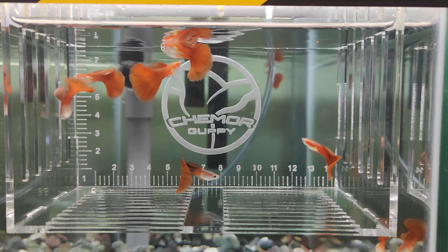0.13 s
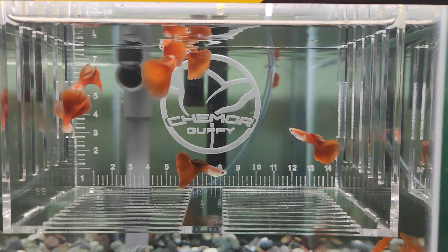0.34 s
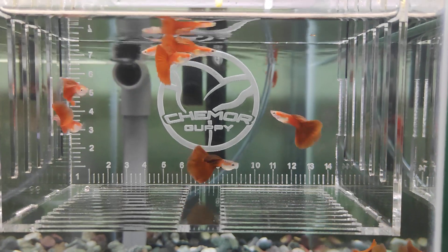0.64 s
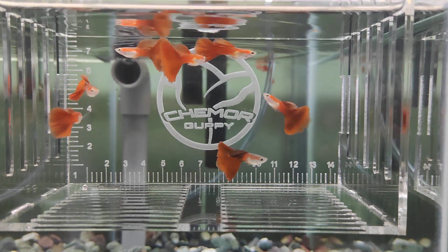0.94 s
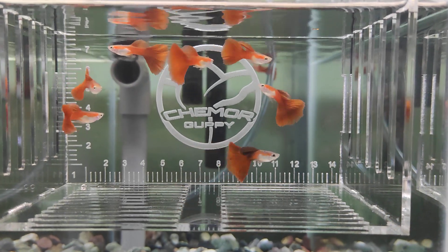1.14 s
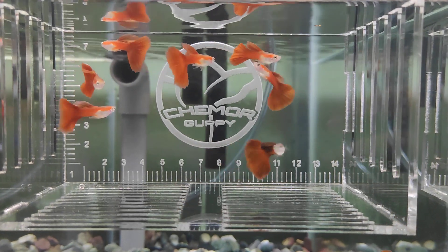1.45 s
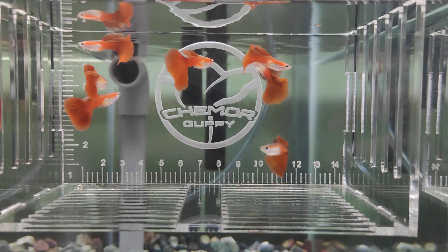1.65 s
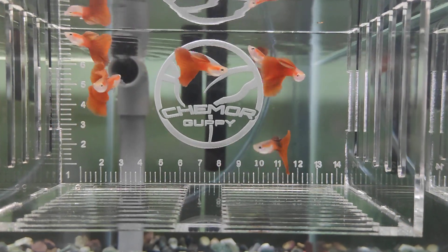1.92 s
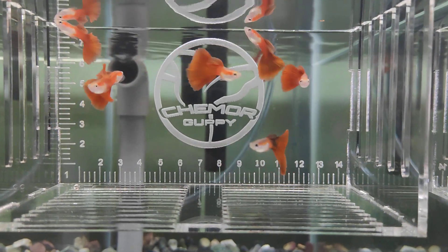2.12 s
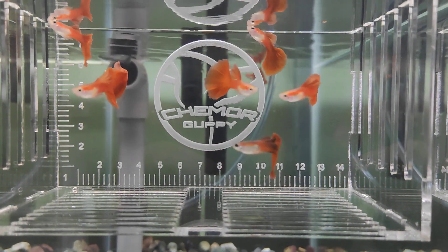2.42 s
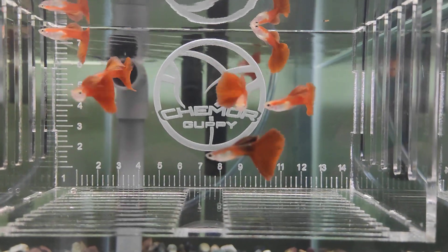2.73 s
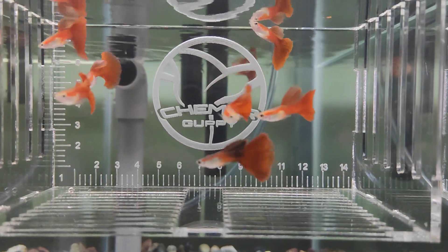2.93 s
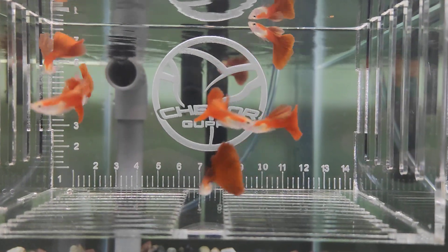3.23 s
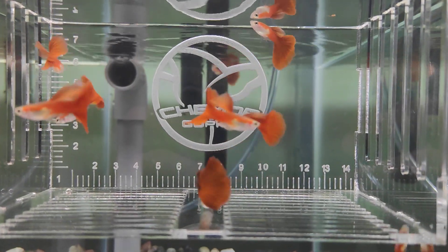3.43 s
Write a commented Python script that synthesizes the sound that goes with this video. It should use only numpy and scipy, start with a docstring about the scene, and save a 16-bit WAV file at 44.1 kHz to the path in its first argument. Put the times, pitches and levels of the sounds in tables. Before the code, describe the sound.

Steady fizzing trickle of fish tank filter water, with small bubble pops and faint pump hum.

```python
"""Water from an aquarium filter trickles back into the tank in a small room: a fizz of ringing bubbles
over a smooth noise hiss. Louder bubbles burst and short splashes spray, both as narrow noise.
A pump drones below as coloured noise and gurgling, with faint mains sines and a deep noise rumble.
A hand-held two-microphone recorder fades in; its right port faces the water and rings near 5.5 kHz,
its left port is duller."""
import sys
import numpy as np
from scipy import signal
from scipy.fft import rfft, irfft
from scipy.io import wavfile

SR = 44100
rng = np.random.default_rng(int(sys.argv[2]) if len(sys.argv) > 2 else 0)


def digitize_waveform(pressure):
    """Quantize a signal to 16-bit integers and store it at the path in sys.argv[1].

    Rows of a 2-D input are taken as channels; values are limited to [-1, 1].
    """
    field = np.atleast_2d(pressure).T
    bounded = np.clip(field, -1, 1)
    quanta = np.round(bounded * 32767).astype(np.int16)
    wavfile.write(sys.argv[1], SR, quanta)


N = 157437
TIME_S = np.arange(N) / SR
BIN_HZ = np.fft.rfftfreq(N, 1 / SR)


def amp(db):
    """Amplitude ratio of a level in dB."""
    return 10 ** (np.asarray(db) / 20)


def rms_one(x):
    """Scale to an RMS of 1 over all channels."""
    return x / np.sqrt(np.mean(x ** 2) + 1e-20)


def at_time(points):
    """Join (s, value) points by straight lines over the scene."""
    return np.interp(TIME_S, *np.transpose(points))


def at_hz(points, hz):
    """Join (Hz, value) points by straight lines over log frequency."""
    p = np.array(points)
    return np.interp(np.log(hz + 1e-9), np.log(p[:, 0]), p[:, 1])


def drift(rate_hz):
    """Random wander: normal values, two per cycle of rate_hz, joined by straight lines."""
    knots = rng.standard_normal(200)
    return np.interp(TIME_S * rate_hz * 2, np.arange(len(knots)), knots)


def colour(x, points):
    """Filter by a (Hz, dB) spectrum, falling steeply below its first point."""
    low_hz = points[0][0]
    low_end = (BIN_HZ > low_hz / 2) * np.minimum(1, BIN_HZ / low_hz) ** 4
    return irfft(rfft(x) * amp(at_hz(points, BIN_HZ)) * low_end, N)


def patchy(low_hz, high_hz, count, patchy_db):
    """Two white noises whose overlapping bands flicker in level, partly together."""
    white = rfft(rng.standard_normal((2, N)))
    log_place = np.log((BIN_HZ + 1) / low_hz) / np.log(high_hz / low_hz)
    place = np.clip(log_place, 0, 1) * (count - 1)
    together = drift(3.97)
    out = 0
    for k in range(count):
        one_band = irfft(white * np.clip(1 - abs(place - k), 0, 1), N)
        out = out + amp(patchy_db * (together / 2 + drift(14.0))) * one_band
    return out


def band(x, hz, width, order=2):
    """Band-pass from hz / (1 + width) to hz * (1 + width), applied twice."""
    edges_hz = [hz / (1 + width), min(hz * (1 + width), .45 * SR)]
    sos = signal.butter(order, edges_hz, "band", fs=SR, output="sos")
    return signal.sosfilt(np.vstack([sos, sos]), x)


ROOM_T60_S, ROOM_DB = .12, 5   # ROOM_DB: reflections re direct sound


def room(x, db=ROOM_DB):
    """Direct sound plus a dying scatter of reflections, different for each port."""
    t = np.arange(SR // 4) / SR
    tail = rng.standard_normal((2, len(t))) * amp(-60 * t / ROOM_T60_S) * (t > .002)
    tail *= amp(db) / np.sqrt(np.sum(tail ** 2, axis=1, keepdims=True))
    tail[0, 11] = tail[1, 0] = 1   # direct sound, 11 samples later on the left
    return signal.fftconvolve(x * np.ones((2, 1)), tail, axes=1)[:, :N]


def bubbles(low_hz, high_hz, per_s, cycles, spread_db):
    """Bubbles born at random, each swelling quickly and ringing some cycles at one of 30 pitches."""
    sizes = amp(spread_db * np.minimum(rng.exponential(1, N), 4)) * rng.choice([-1, 1], N)
    born = rng.random(N) < per_s * amp(1.5 * drift(6.0)) / SR
    pitch_index = rng.integers(0, 30, N)
    out = 0
    for k, hz in enumerate(np.geomspace(low_hz, high_hz, 30)):
        r = amp(-120 * hz / (cycles * SR))
        w = 2 * np.pi * hz / SR
        sos = [[np.sin(w), 0, 0, 1, -2 * r * np.cos(w), r * r]] * 2   # twice: swells, then dies
        impulses = sizes * born * (pitch_index == k)
        out = out + signal.sosfilt(sos, impulses + 1e-18) * (hz / SR) ** 2
    return out


# Deepest rumble: start_s, level_db
RUMBLE_LEVEL = [(0.3, -56.5), (1.11, -57), (1.36, -59), (1.67, -51.5), (1.76, -59), (1.92, -49),
                (2.24, -58), (2.38, -47.5), (2.7, -55), (3.57, -53.5)]
RUMBLE_HZ, RUMBLE_WIDTH, RUMBLE_ALIKE = 38.4, 2.47, 0.32


def rumble():
    """Wide low band of noise, partly shared by both sides, its level following the table."""
    deep = rng.standard_normal((3, N))
    sides = deep[:2] + RUMBLE_ALIKE * 2 * deep[2]
    return rms_one(band(sides, RUMBLE_HZ, RUMBLE_WIDTH, order=1)) * amp(at_time(RUMBLE_LEVEL))


# Mains tones: multiple, mean_level_db (RMS), left_minus_right_db
MAINS_TONES = [(1, -62, -7), (10, -66.5, -3), (11, -72, 5), (12, -68.5, 5), (14, -79, -12), (15, -80.5, -3),
               (18, -70, 7)]
MAINS_HZ = 49.97


def mains():
    """Sines at multiples of the mains frequency, each wandering in level."""
    out = 0
    for multiple, db, pan_db in MAINS_TONES:
        side_db = np.array([[pan_db], [-pan_db]]) / 2
        level = amp(db + side_db + 2.0 * drift(1.95)) * np.sqrt(2)
        out = out + level * np.sin(2 * np.pi * (multiple * MAINS_HZ * TIME_S + rng.random()))
    return out


# Pump and room drone spectrum: freq_hz, relative_density_db
DRONE_SPECTRUM = [(53, -21), (90, -2), (104, -4), (125, -10.5), (160, -2), (183, -5.5), (209, -10),
                  (233, -3), (257, -3.5), (289, 0), (396, -10.5), (468, -10.5), (498, -13.5), (528, -12),
                  (596, -12.5), (656, -19), (887, -10), (965, -13.5), (1160, -7), (1230, -12.5),
                  (1270, -16.5), (1440, -21.5), (1600, -15), (2080, -30), (3520, -120)]
# Stereo likeness: freq_hz, left_right_likeness (0 to 1)
DRONE_LIKENESS = [(25, 0.89), (60, 1), (110, 0.55), (200, 0.76), (370, 0.91), (560, 0.34), (760, .25),
                  (1240, 0.29), (1600, 0.17)]
# Stereo balance: freq_hz, left_minus_right_db
DRONE_PAN = [(25, -8), (120, -.5), (370, 0.5), (760, -5), (1100, 1), (1600, 2)]
# Slow change of drone level: start_s, change_db
DRONE_LEVEL = [(.3, 1.5), (1.2, .5), (2.0, -1), (2.45, .5), (2.9, -1), (3.57, -.5)]
DRONE_DB, DRONE_PATCHY_DB = -48, 1.07
# bigger bubbles in the filter outlet
GURGLE_PER_S, GURGLE_DB, GURGLE_SPREAD_DB, GURGLE_CYCLES = 250, -12, 3.5, 22.3


def drone():
    """Low noise and gurgling in the room's resonances, spread by likeness and balance per frequency."""
    gurgle = rms_one(room(bubbles(199.4, 1596, GURGLE_PER_S, GURGLE_CYCLES, GURGLE_SPREAD_DB)))
    noise = rms_one(patchy(37, 1600, count=10, patchy_db=DRONE_PATCHY_DB))
    mid, side = rfft(noise + amp(GURGLE_DB) * gurgle)
    alike = np.clip(at_hz(DRONE_LIKENESS, BIN_HZ), -1, 1)
    both = np.sqrt(1 + alike) * mid + np.sqrt(1 - alike) * side * [[1], [-1]]
    both = both * amp(at_hz(DRONE_PAN, BIN_HZ) / 2 * [[1], [-1]])
    top_end = np.minimum(1, DRONE_SPECTRUM[-1][0] / (BIN_HZ + 1)) ** 8
    both = irfft(both * top_end, N)
    return amp(DRONE_DB + at_time(DRONE_LEVEL)) * rms_one(colour(both, DRONE_SPECTRUM))


# Short splashes: start_s, length_s, level_db (RMS before envelope and room), centre_hz, left_minus_right_db
SPLASHES = [(1.234, 0.021, -43, 10800, -18), (1.331, 0.0088, -41, 8700, -18), (1.218, .015, -46, 9500, -18),
            (1.41, .036, -39, 8800, -18), (2.02, .01, -47, 10200, -18), (2.333, 0.0059, -38.5, 3000, -0.5),
            (2.342, 0.0067, -38, 2030, -2), (2.711, 0.035, -44, 7700, -18), (2.84, 0.027, -46, 7650, -21),
            (3.183, .015, -53, 11000, -12), (3.27, 0.035, -52, 1670, 0), (3.468, .012, -43, 7800, -20)]


def splashes():
    """Bands of noise, each under half a sine of level."""
    out, t = np.zeros((2, N + SR)), np.arange(SR // 10) / SR
    for start_s, length_s, db, hz, left_db in SPLASHES:
        spray = rms_one(band(rng.standard_normal(len(t)), hz, 0.21))
        swell = np.sin(np.pi * np.clip(t / length_s, 0, 1))
        here = out[:, int(start_s * SR):][:, :len(t)]
        here += amp(db) * spray * swell * amp([[left_db], [0]])
    return out[:, :N]


# Bursting bubbles: start_s, relative_peak_db, pitch_hz, relative_width
BURSTS = [(0.2884, -27, 5800, 0.17), (0.5494, -27.5, 6150, 0.51), (0.616, -33, 5530, 0.2),
          (0.6529, -28, 5940, 0.1), (1.0094, -29, 5330, 0.12), (1.2366, -27, 5800, 0.16),
          (1.504, -32, 5400, 0.22), (1.5484, -34, 5600, 0.15), (1.6452, -38, 5130, 0.18),
          (1.6687, -31, 5500, 0.23), (1.6844, -33, 6130, 0.2), (1.7, -32, 6490, 0.18),
          (1.7285, -26.5, 6400, 0.2), (1.7444, -42, 5460, 0.2), (1.7828, -23.5, 7500, 0.18),
          (2.1934, -34.5, 5200, 0.13), (2.2882, -40, 5940, 0.2), (2.3052, -25.5, 5770, 0.15),
          (2.4803, -23, 5850, 0.15), (2.6054, -37, 5800, 0.22), (2.6998, -29.5, 8010, 0.093),
          (2.7294, -37, 6160, 0.22), (2.8394, -26.5, 6860, 0.21), (2.885, -33, 5470, 0.13),
          (2.9243, -26, 6200, 0.11), (2.9597, -37, 6980, 0.2), (3.1014, -31.5, 5350, 0.26),
          (3.2335, -27, 6340, 0.1), (3.467, -48, 5200, 0.22)]
BURST_S, BURST_TRIM_DB, BURST_LEFT_DB = .0055, .2, -22   # BURST_S: Gaussian decay before the band-pass


def bursts():
    """Larger bubbles burst: a click and a few ms of noise through a narrow band."""
    out, t = np.zeros((2, N + SR)), np.arange(SR // 10) / SR
    for start_s, db, hz, width in BURSTS:
        puff = (rng.standard_normal(len(t)) + 2.4 * (t == 0)) * np.exp(-(t / BURST_S) ** 2)
        pop = band(puff, hz, np.clip(width, .05, .5))
        here = out[:, int(start_s * SR):][:, :len(t)]
        here += amp(db + BURST_TRIM_DB) * pop / abs(pop).max() * amp([[BURST_LEFT_DB], [0]])
    return out[:, :N]


# Water flow: start_s, relative_level_db
WATER_FLOW = [(0.3, -47), (0.37, -44.5), (0.45, -45.5), (0.83, -45.5), (1.2, -45.5), (1.46, -45),
              (1.96, -46.5), (2.5, -45.5), (3.57, -46.5)]
# Water as the right port hears it: freq_hz, relative_density_db
RIGHT_PORT_SPECTRUM = [(1200, 3), (1450, -20.5), (1650, -8.5), (1850, -17), (2300, -7.5), (2500, -12),
                       (3250, -9), (4250, -11.5), (4800, -6), (5150, 1), (5420, 0.5), (5750, 0.5),
                       (6100, -1), (6500, -3), (7200, -5), (8800, -9), (10300, -13), (12000, -13.5),
                       (12800, -17.5), (14000, -13.5)]
# Water as the left port hears it: freq_hz, relative_density_db
LEFT_PORT_SPECTRUM = [(1200, -30), (1550, -13), (2070, -11), (2580, -13), (3100, -10), (4130, -13),
                      (5170, -12), (6200, -15), (7240, -19), (8270, -24), (9300, -34), (10400, -33),
                      (11400, -30), (12400, -23), (13400, -21), (14200, -23)]
# Left port turns from the water: start_s, left_change_db
LEFT_TURN = [(.3, 1.5), (1.2, 1.5), (2.2, 0), (2.9, -1.5), (3.57, -0.5)]
FIZZ_PER_S, FIZZ_DB, FIZZ_SPREAD_DB, FIZZ_CYCLES = 1500, -3, 2.5, 24
HISS_DB, HISS_PATCHY_DB, WATER_TRIM_DB = -1, 2, 6.5


def water():
    """Hiss and fizz of tiny bubbles under one flow, coloured by each port."""
    fizz = rms_one(room(bubbles(1393, 13730, FIZZ_PER_S, FIZZ_CYCLES, FIZZ_SPREAD_DB)))
    hiss = rms_one(patchy(1280, 18500, count=10, patchy_db=HISS_PATCHY_DB))
    mix = amp(FIZZ_DB) * fizz + amp(HISS_DB) * hiss
    left = colour(mix[0], LEFT_PORT_SPECTRUM)
    right = colour(mix[1], RIGHT_PORT_SPECTRUM)
    gain = amp(at_time(WATER_FLOW) + WATER_TRIM_DB) / np.std(right)
    return gain * np.array([left * amp(at_time(LEFT_TURN)), right])


def scene():
    """Sum the background, the bursts and splashes in their room, and the water."""
    return rumble() + mains() + drone() + room(bursts() + splashes(), db=-2.5) + water()


FADE_START_S, FADE_S = 0.091, .2
OFFSET, OFFSET_HZ, OFFSET_DAMPING = .058, .22, 1.1
CUTOFF_HZ = 14240


def record(dry):
    """Fade in; the left input's offset rises with the fade and settles; the top is cut."""
    fade = np.clip((TIME_S - FADE_START_S) / FADE_S, 0, 1) * (TIME_S > .104)
    w = 2 * np.pi * OFFSET_HZ
    high_pass = signal.bilinear([1, 0, 0], [1, 2 * OFFSET_DAMPING * w, w * w], SR)
    settle = signal.lfilter(*high_pass, fade)
    out = dry * fade + OFFSET * settle * [[1], [0]]
    return signal.sosfilt(signal.ellip(16, .3, 70, CUTOFF_HZ, fs=SR, output="sos"), out)


dry = scene()
out = record(dry)
digitize_waveform(out)
```